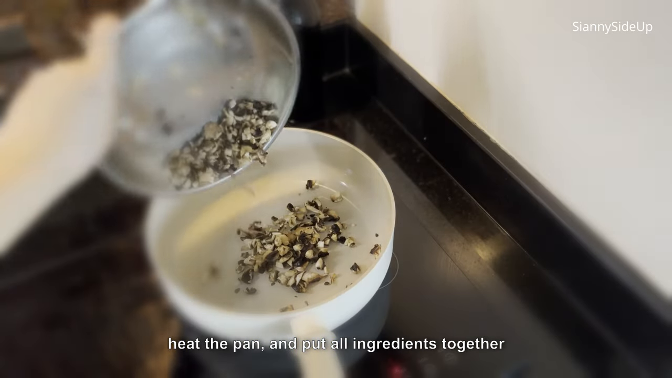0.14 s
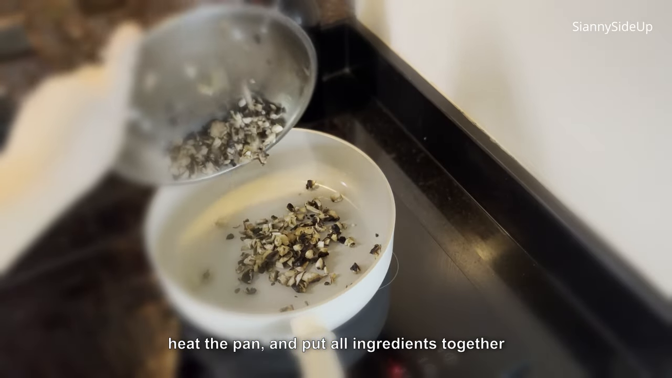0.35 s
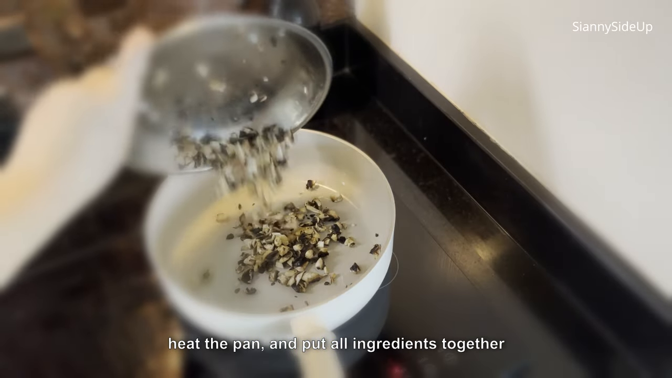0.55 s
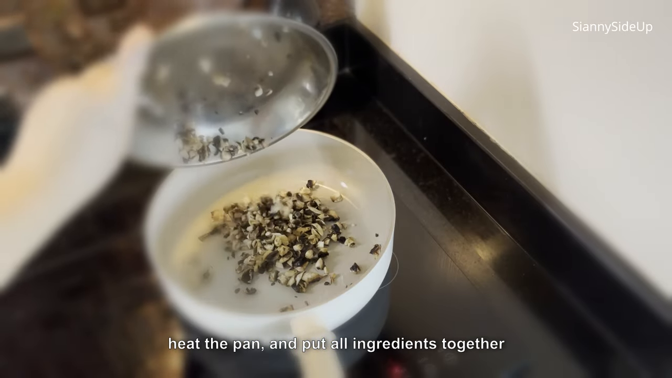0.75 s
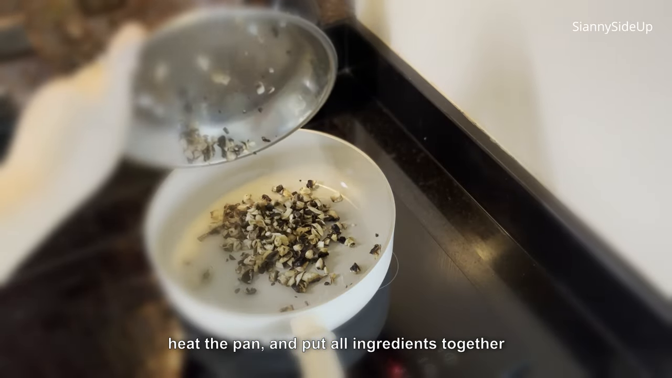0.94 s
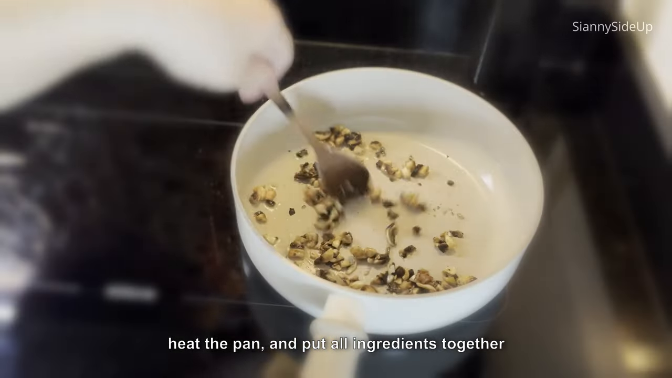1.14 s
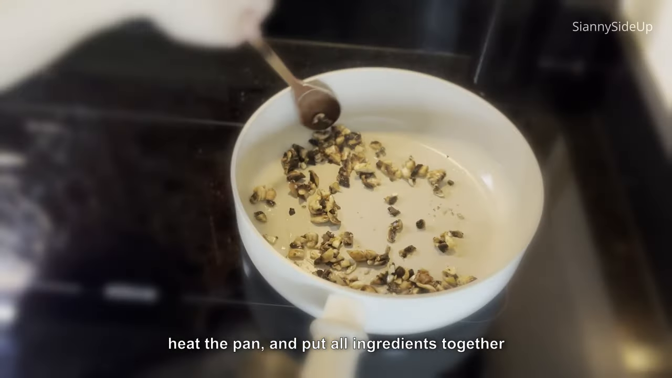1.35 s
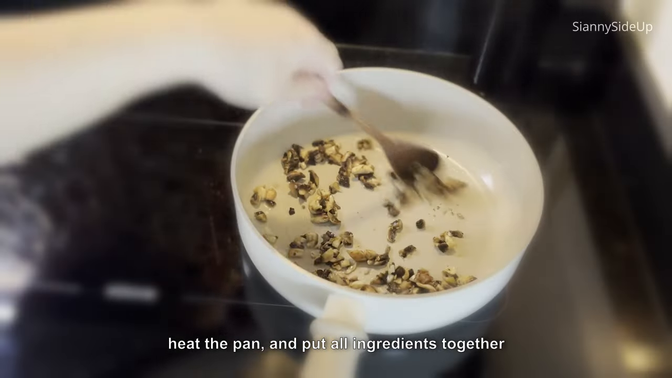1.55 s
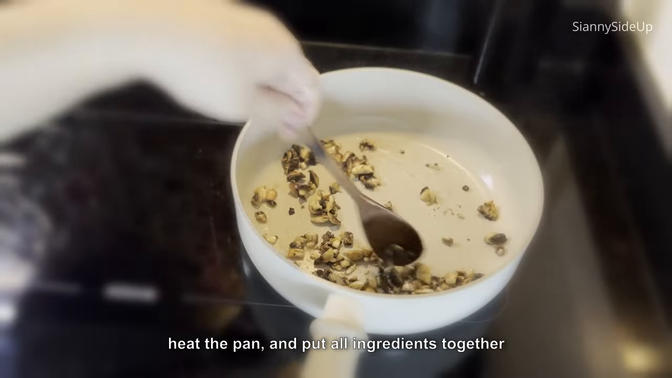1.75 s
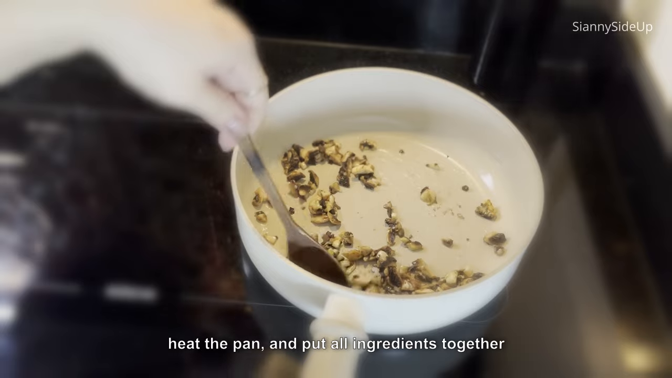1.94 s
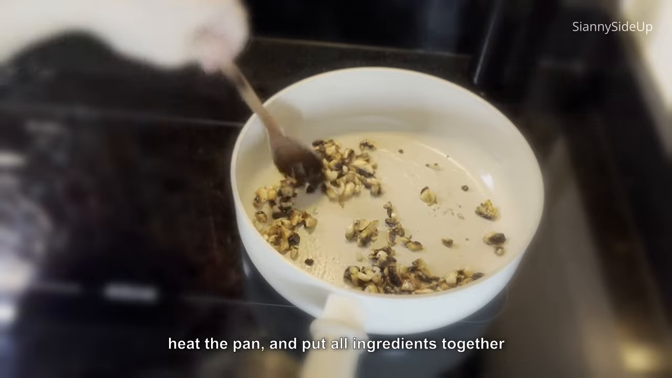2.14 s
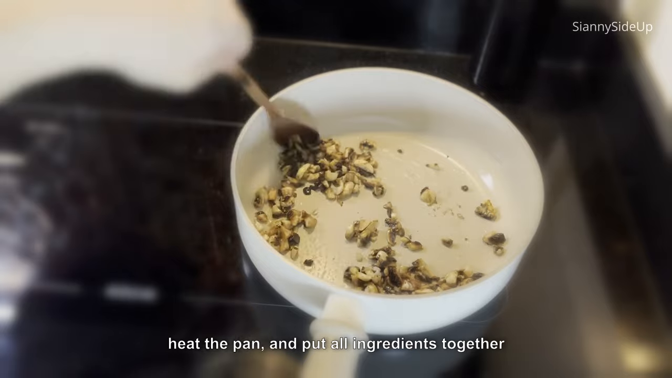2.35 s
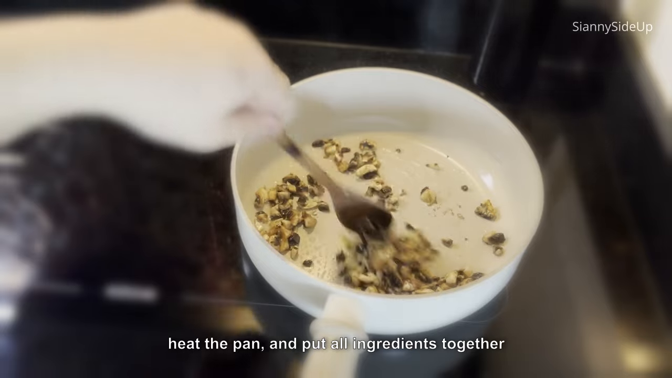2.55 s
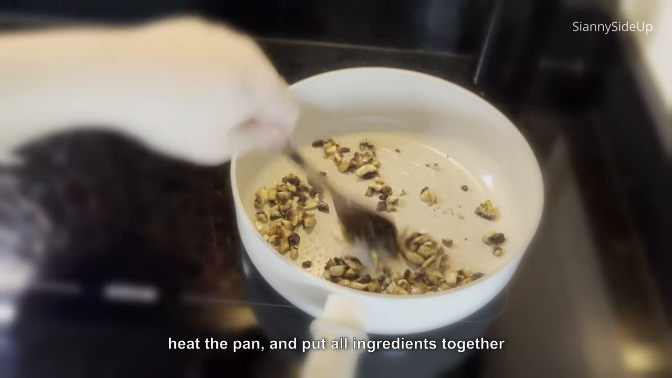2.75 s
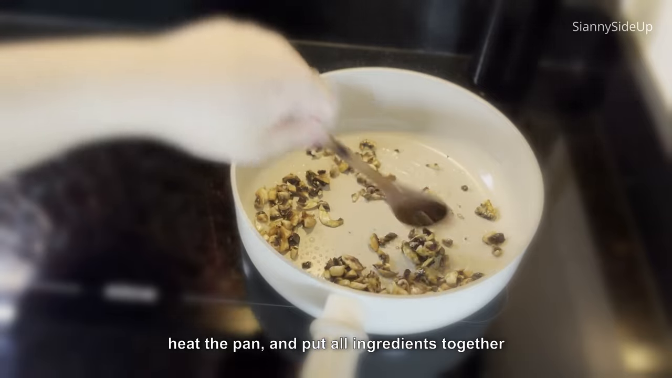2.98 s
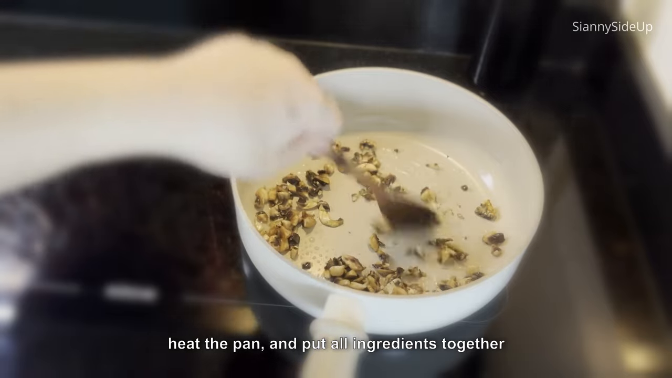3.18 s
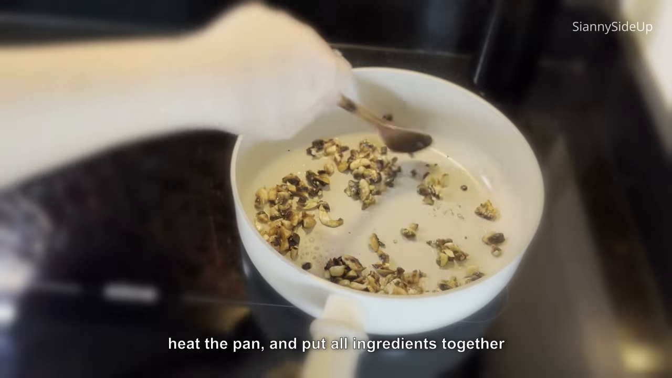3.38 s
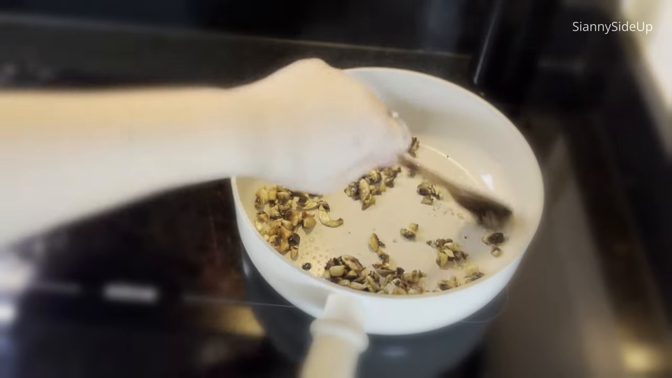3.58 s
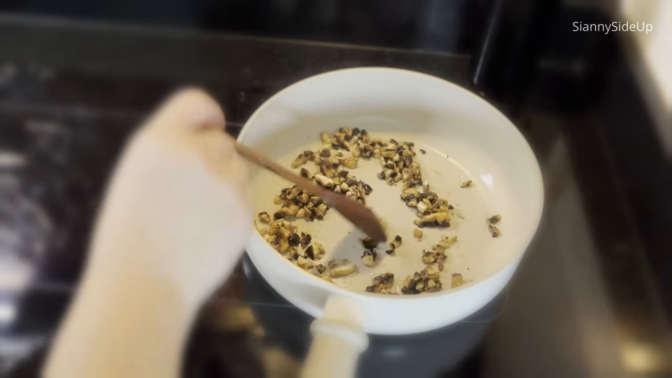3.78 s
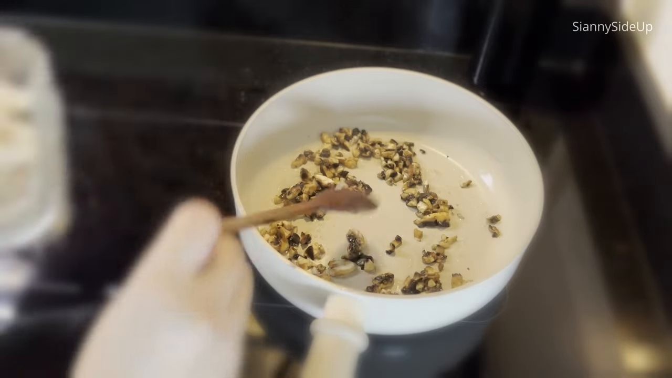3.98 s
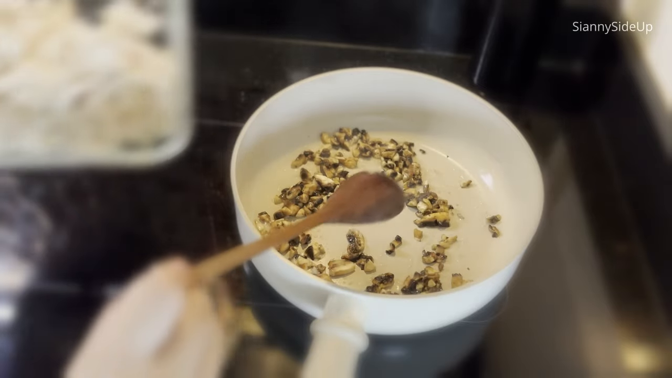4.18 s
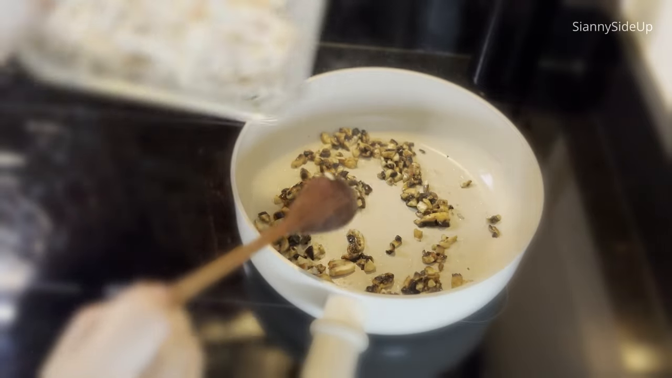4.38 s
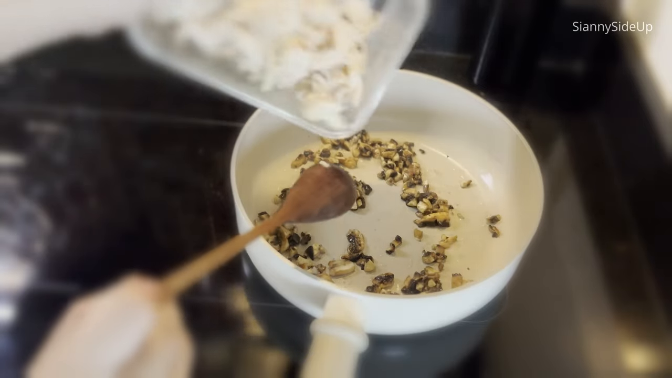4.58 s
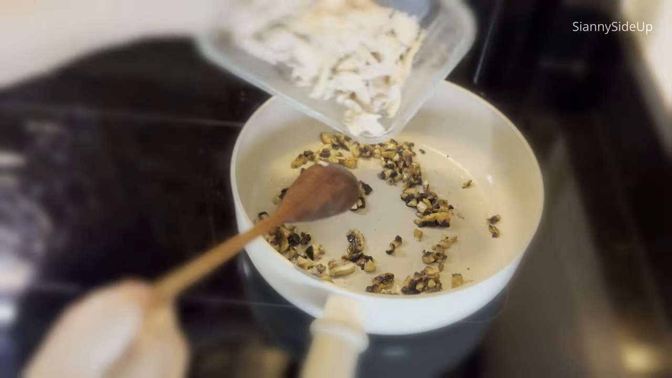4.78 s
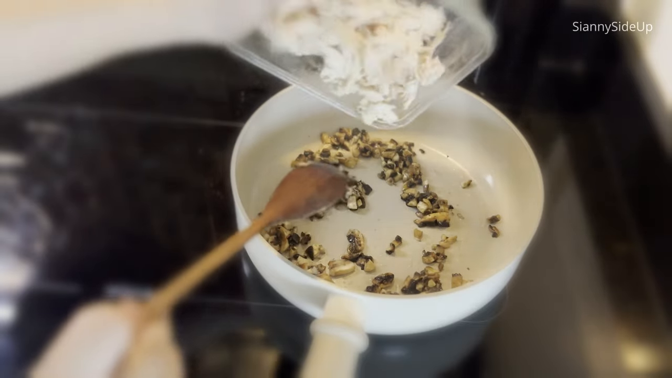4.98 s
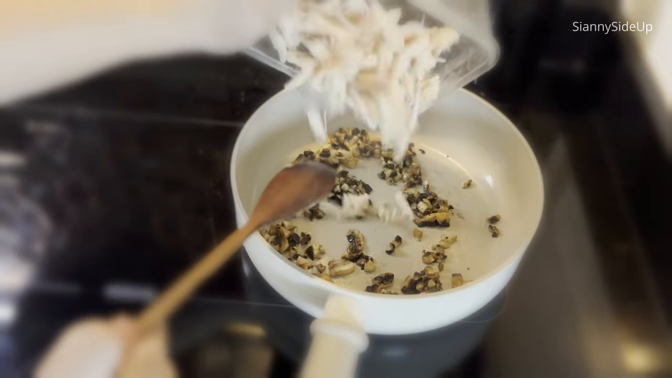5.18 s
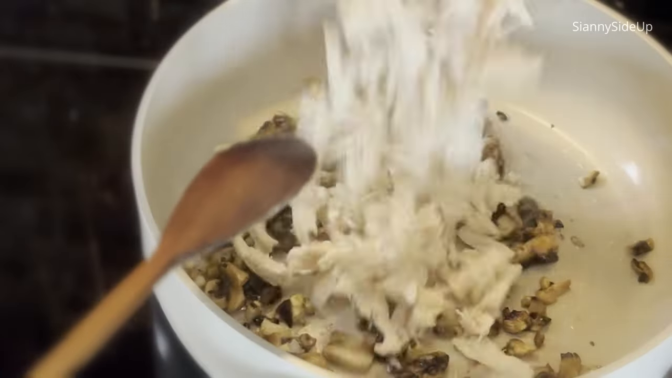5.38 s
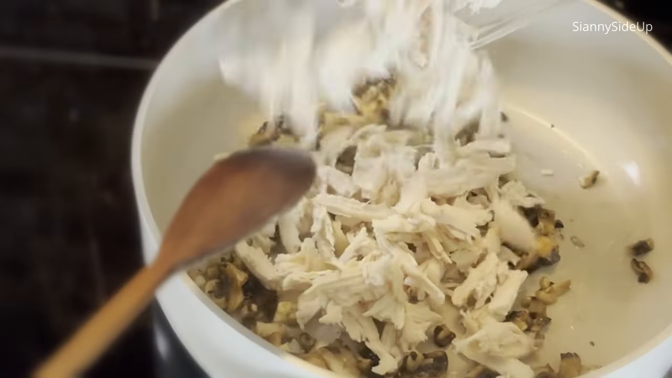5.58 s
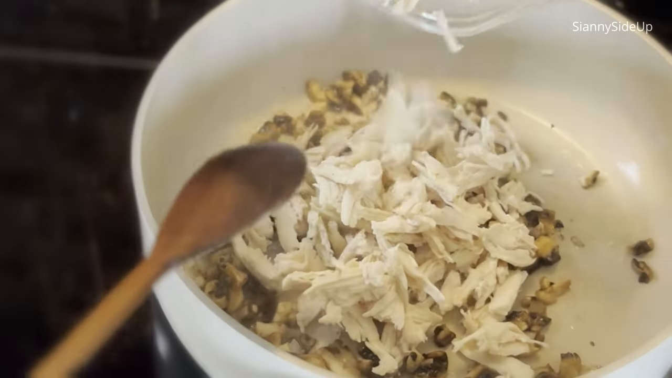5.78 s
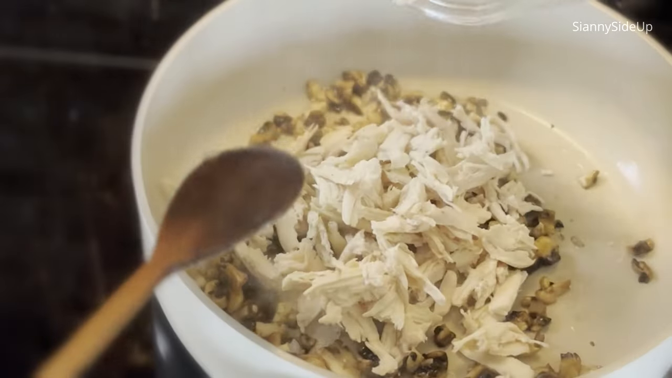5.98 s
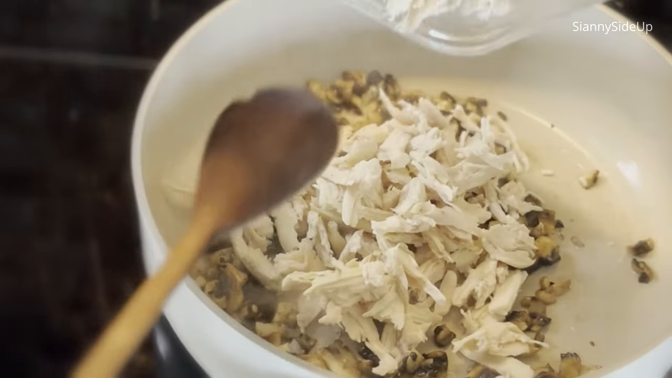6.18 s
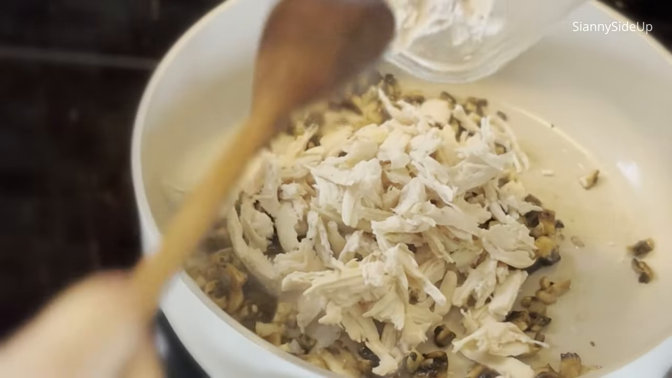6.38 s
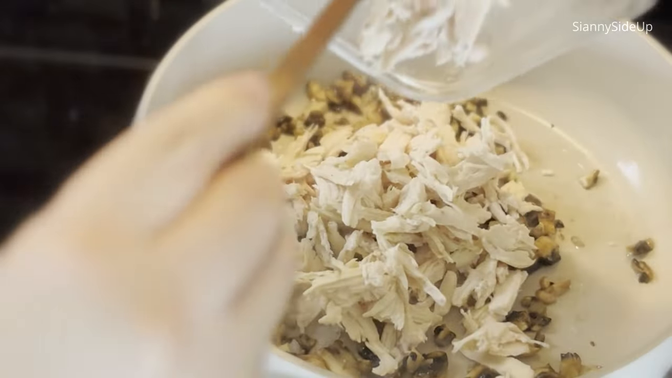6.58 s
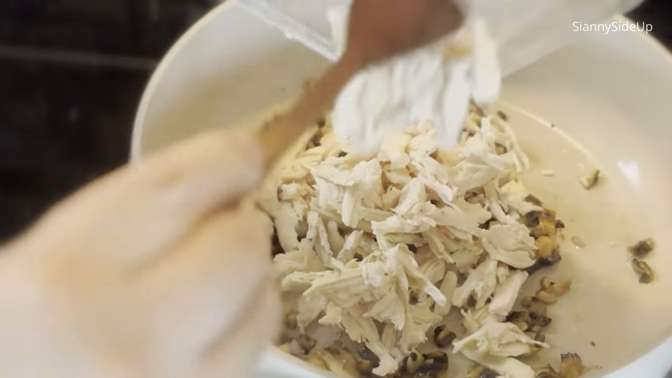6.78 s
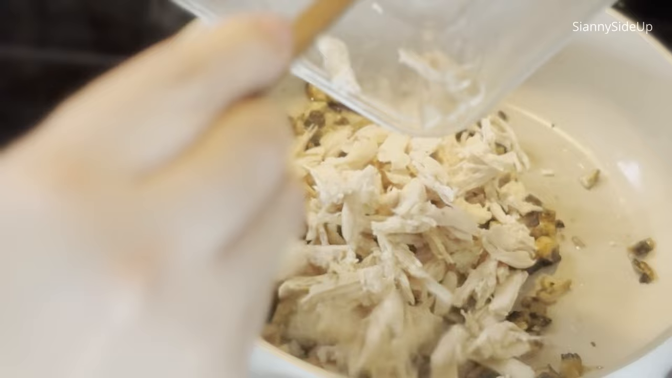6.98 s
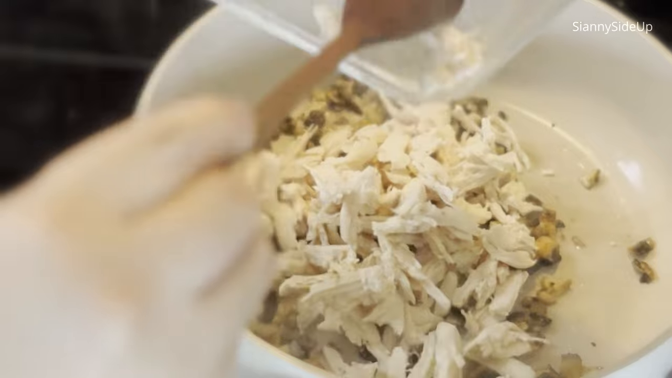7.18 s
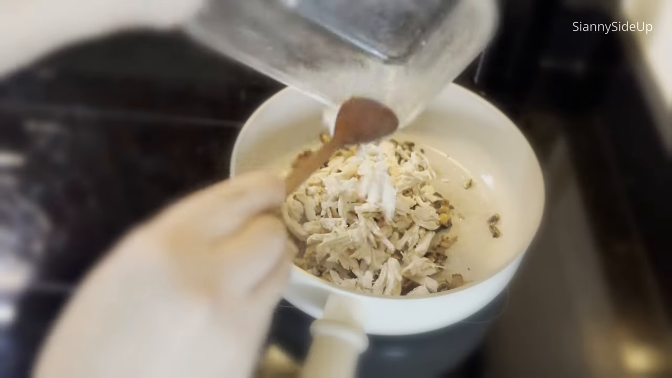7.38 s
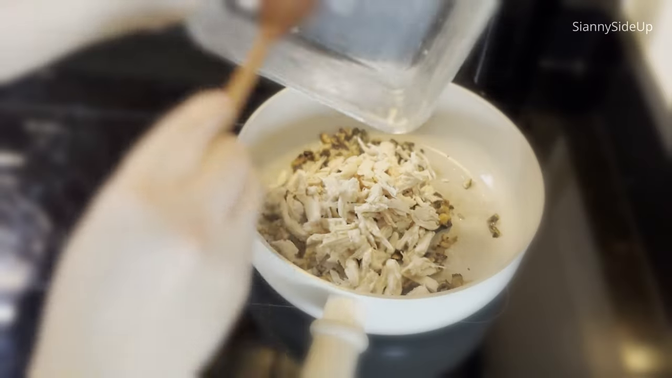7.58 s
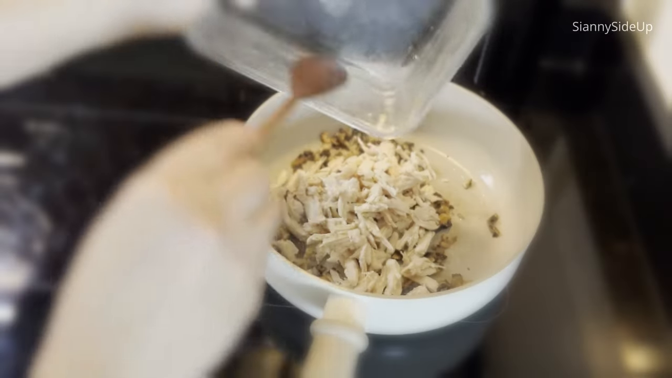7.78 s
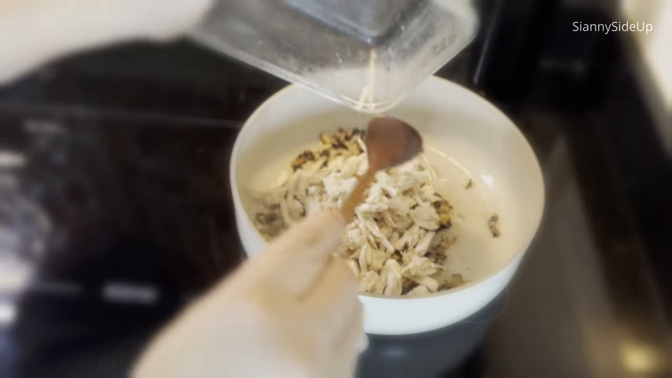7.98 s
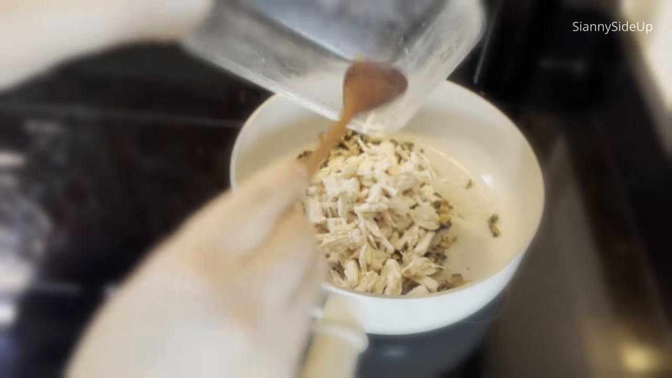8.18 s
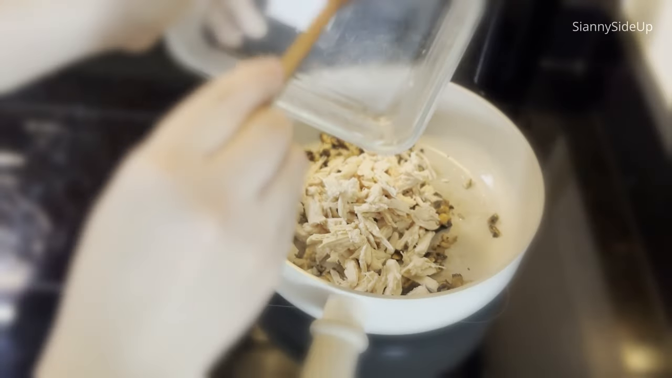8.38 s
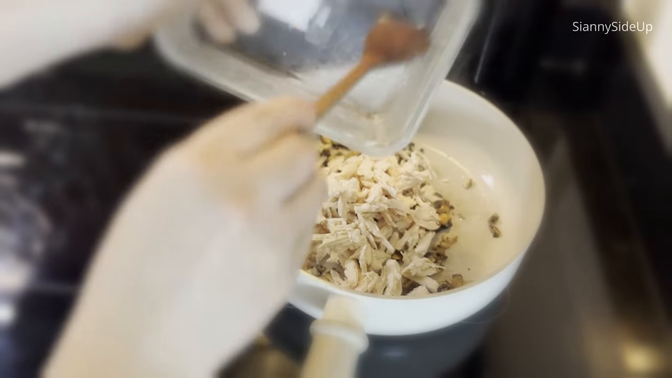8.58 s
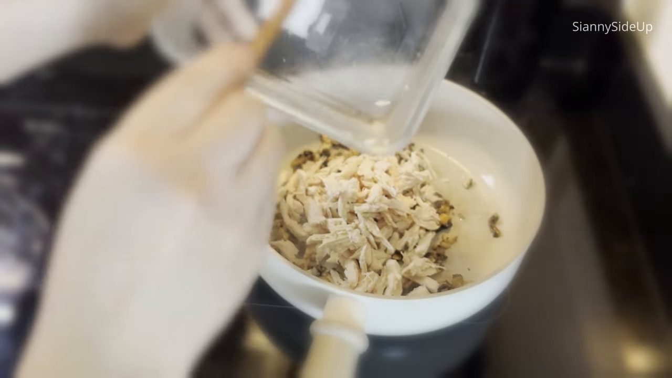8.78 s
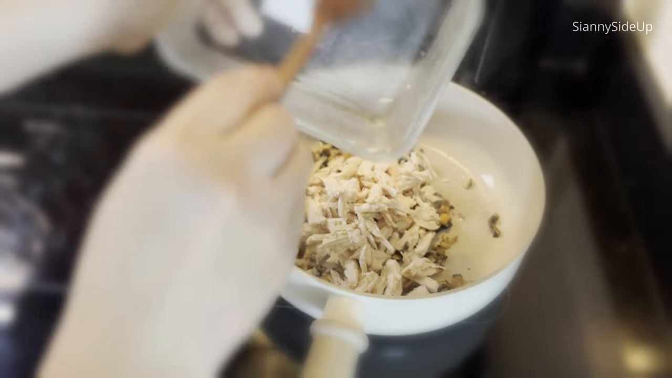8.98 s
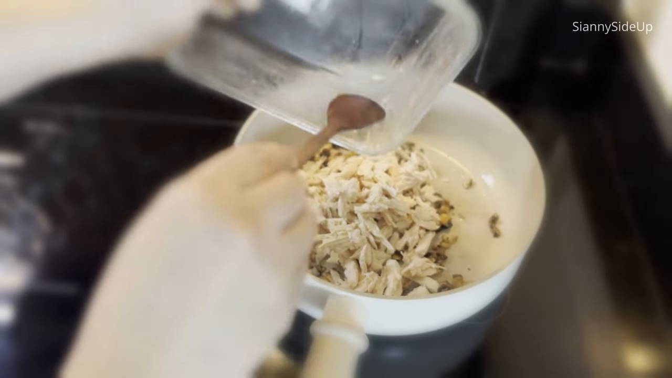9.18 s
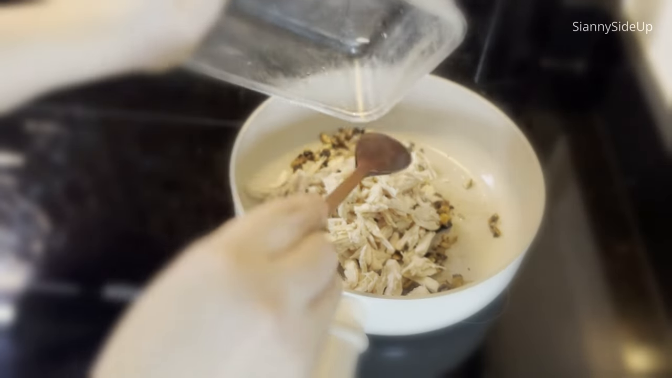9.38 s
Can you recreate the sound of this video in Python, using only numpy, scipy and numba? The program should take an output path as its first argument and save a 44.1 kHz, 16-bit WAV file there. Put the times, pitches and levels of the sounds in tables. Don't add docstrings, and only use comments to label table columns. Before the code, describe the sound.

Chopped food sizzles softly in a pan while a wooden spoon stirs and taps, then knocks sharply on a glass dish being emptied.

```python
import sys
import numpy as np
from scipy import signal
from scipy.fft import rfft, irfft
from scipy.io import wavfile
from numba import njit

SR = 44100
rng = np.random.default_rng(int(sys.argv[2]) if len(sys.argv) > 2 else 0)


def wav_record(signal):
    frames = np.transpose(np.atleast_2d(signal))
    bounded = np.clip(frames, -1, 1)
    quanta = np.round(bounded * 32767).astype(np.int16)
    wavfile.write(sys.argv[1], SR, quanta)


def how_loud(loudness_db):
    steps = np.asarray(loudness_db, float) / 20
    return 10 ** steps


N = 416241

# start in seconds, then hiss, crackle and pan body, all
# in dB.
STAGES = [
    (0.0, -62.5, -63, -73.5),
    (1.048, -65, -70.5, -67),
    (3.705, -59, -60.5, -63.5),
    (5.35, -57, -60, -61.5),
    (7.1, -56.5, -61.5, -61.5),
]


def rms_one(x):
    return x / np.sqrt(np.mean(x ** 2) + 1e-20)


def in_time(rows, silent_db=-120):
    s, first, *rest = np.transpose(rows)
    t = np.arange(N) / SR
    return [np.interp(t, s, first, silent_db, silent_db)] + [np.interp(t, s, c) for c in rest]


def held(rows, column):
    rows = np.array(rows)
    row_now = np.searchsorted(rows[:, 0], np.arange(N) / SR, "right") - 1
    return rows[np.maximum(row_now, 0), column]


def swells(rows, lean, column=2):
    t = np.arange(N) / SR
    power = np.zeros(N)
    for row in rows:
        done = np.clip((t - row[0]) / row[1], 0, 1)
        height = np.sin(np.pi * done ** lean) ** 0.72
        power += (how_loud(row[column]) * height) ** 2
    return 10 * np.log10(power + 1e-14)


def drift(rate):
    every, settle = 40, 2000
    r = np.exp(-2 * np.pi * every * rate / SR)
    noise = rng.standard_normal(N // every + settle + 2)
    slow = signal.lfilter([1], [1, -2 * r, r * r], noise)[settle:]
    return np.interp(np.arange(N) / every, np.arange(len(slow)), rms_one(slow))


def colour(x, points):
    hz, level_db = np.transpose(points)
    grid = np.maximum(np.fft.rfftfreq(len(x), 1 / SR), 1)
    gain = how_loud(np.interp(np.log(grid), np.log(hz), level_db, -90, -90))
    return rms_one(irfft(rfft(x) * gain, len(x)))


def pops(per_s, spread_db, smooth):
    sizes = how_loud(spread_db * np.minimum(rng.exponential(1, N), 5)) * rng.choice([-1, 1], N)
    bursts = rms_one(sizes * (rng.random(N) < per_s / SR))
    return rms_one(bursts + smooth * rng.standard_normal(N))


@njit
def sweep(x, hz, r, sr):
    y = np.zeros(len(x))
    for i in range(2, len(x)):
        y[i] = x[i] - x[i - 2] + 2 * r * np.cos(2 * np.pi * hz[i] / sr) * y[i - 1] - r * r * y[i - 2]
    return y


def whistle(level_db, hz, width_hz):
    r = np.exp(-np.pi * width_hz / SR)
    once = sweep(rng.standard_normal(len(hz)), hz, r, SR)
    return how_loud(level_db) * rms_one(sweep(once, hz, r, SR))


def ring(force, hz, t60):
    r, w = how_loud(-60 / (t60 * SR)), 2 * np.pi * hz / SR
    return signal.lfilter([0, np.sin(w)], [1, -2 * r * np.cos(w), r * r], force + 1e-18)


def struck(blows, modes_hz, modes, rattle_s, rattle, band_hz, trim_db, crack_db, crack_t60, reach_above=0.74):
    out, size = np.zeros(N), 4096
    crack_count, reach_below = 18, 1.3
    modes_hz = [*modes_hz, *np.geomspace(*band_hz, num=crack_count)]
    modes = [*modes, *[(crack_db, crack_t60)] * crack_count]
    shape = np.exp(-np.arange(size) / (rattle_s * SR))
    contacts = rng.standard_normal((len(blows), len(modes), size))
    touch = rattle * contacts * shape / np.sqrt(np.sum(shape ** 2))
    touch[:, :, 0] = 1
    for m, (hz, (level_db, t60)) in enumerate(zip(modes_hz, modes)):
        force = np.zeros(N + size)
        for k, (s, peak_db, pivot_hz, below, above) in enumerate(blows):
            octaves = np.clip(np.log2(hz / pivot_hz), -reach_below, reach_above)
            tilt_db = octaves * (above if octaves > 0 else below)
            force[round(s * SR):][:size] += how_loud(peak_db + tilt_db + level_db + trim_db) * touch[k, m]
        out += (-1) ** m * ring(force[:N], hz, t60)
    low_hz, high_hz = band_hz
    out = signal.sosfilt(signal.butter(3, low_hz, "high", fs=SR, output="sos"), out)
    return signal.sosfilt(signal.butter(10, high_hz, fs=SR, output="sos"), out)


def frying():
    # time in seconds, vigour in dB.
    pour_rows = [
        (0.0, -1.5),
        (0.2, 2),
        (0.25, 1.5),
        (0.514, 3),
        (0.56, 2),
        (0.622, 0),
        (0.712, 9),
        (0.94, 11.5),
        (1.048, 10.5),
    ]
    # time in seconds, vigour in dB.
    fry_rows = [(1.05, 5.5), (1.22, 6.5), (1.47, 4.5), (1.82, 8), (2.03, 5), (2.6, 7.5), (3.01, 5.5),
                (3.7, 5), (3.71, 1), (3.92, 1.3), (4.99, -0.5), (5.35, 1), (5.42, 1.5), (5.6, 0), (6.7, 0),
                (7.23, 0.8), (7.36, 0), (9.44, -0.1)]
    pour_follow = [1.08, 0.58, 0.5]
    fry_follow = [0.8, 1.4, 0.43]
    # frequency in Hz, density in dB per Hz.
    hiss_shape = [(1940, -87), (3300, -9), (3960, -26.5), (4260, -6), (4660, 4), (5210, -0.5), (5640, -6),
                  (6500, -10.5), (8450, -11.5), (14300, -120)]
    crackle_shape = [(3410, -43), (5800, -5.5), (6960, -5), (7400, -0.5), (8690, 0.5), (9360, -1.5),
                     (10100, -1.5), (10700, -9.5), (11000, -9), (11800, -4), (13200, -1), (13700, -2),
                     (15600, -9)]
    body_shape = [(260, -45), (450, -7.5), (476, -9), (518, -10.5), (636, -1), (1050, -6), (1200, -1),
                  (1470, -2.5), (2010, 1.5), (2580, 3), (2890, 7), (3420, -3.5), (4200, 4.5), (5460, -22),
                  (9240, -120)]
    # frequency in Hz, density in dB per Hz.
    early_body_shape = [(400, -46), (700, -13), (1300, -17.5), (2000, -12), (2500, -7), (2700, 2.5),
                        (2950, -8), (3100, -8), (3450, -10), (3900, -3), (4200, -4), (5000, -43)]
    early = np.arange(N) < STAGES[1][0] * SR
    (pour,), (vigour,) = in_time(pour_rows, silent_db=-1.5), in_time(fry_rows, silent_db=0)
    hiss_db, crackle_db, body_db = [
        held(STAGES, column=k + 1) + pour_follow[k] * pour + fry_follow[k] * vigour for k in range(3)]
    shared = drift(12.0)

    fizz = pops(6000, 6.3, 1.46)
    early_hiss_shape = np.multiply(hiss_shape, [1.024, 1])
    fizz = np.where(early, colour(fizz, early_hiss_shape), colour(fizz, hiss_shape))
    hiss = how_loud(hiss_db + 0.69 * shared + 0.61 * drift(25)) * fizz

    snaps = colour(pops(11000, 4.0, 2.8), crackle_shape)
    crackle = how_loud(crackle_db + 0.5 * shared + 1.05 * drift(32)) * snaps

    bursts = pops(2500, 1.6, 2.3)
    bursts = np.where(early, colour(bursts, early_body_shape), colour(bursts, body_shape))
    body = how_loud(body_db + 0.5 * shared + 1.52 * drift(6.5)) * bursts
    return hiss + crackle + body


def spits():
    # time in seconds, peak in dB, pitch in Hz.
    landing = [(0.6606, -48, 4770), (0.6771, -35, 4920), (0.704, -46, 4780), (0.721, -35, 5110),
               (0.7305, -37, 4600), (0.7399, -40, 4660), (0.7619, -44, 4650), (0.8088, -34, 5000),
               (0.8457, -37, 4680), (0.8599, -36, 4840), (0.8729, -37, 5000), (0.8901, -34, 4910),
               (0.9001, -36, 4830), (0.9079, -34, 5060), (0.9265, -37, 4620), (0.9405, -31, 4560),
               (0.9514, -32, 4530), (0.9693, -30, 4730), (0.9796, -35, 4940), (0.9949, -32, 5170),
               (1.0093, -31, 4640), (1.0419, -36, 5050)]
    # time in seconds, peak in dB, pitch in Hz.
    stirred = [(1.6771, -44, 4690), (1.707, -39, 4700), (1.7184, -41, 4560), (1.7816, -44, 4960),
               (2.167, -45, 4680), (2.1824, -47, 4650), (2.2119, -47, 4700), (2.2204, -45, 4850),
               (2.2284, -46, 4600), (2.2608, -48, 4640), (2.2874, -47, 4730), (2.3082, -39, 4810),
               (2.5326, -49, 4720), (2.5596, -47, 4670), (2.58, -41, 4740), (2.5904, -41, 4820),
               (2.609, -35, 4590), (2.6624, -49, 4660), (2.712, -48, 4760)]
    out, size, rows = np.zeros(N), 600, landing + stirred
    puff_s, snap = 0.0026, 3.4
    puffs = rng.standard_normal((len(rows), size)) * np.exp(-np.arange(size) / (puff_s * SR))
    puffs[:, 0] = snap
    for (s, peak_db, hz), puff in zip(rows, puffs):
        burst = ring(puff, hz, t60=0.007)
        bright = how_loud(-16) * np.diff(puff, prepend=0) / 2
        burst = burst / np.abs(burst).max() + bright
        part = out[round(s * SR):][:size]
        part += how_loud(peak_db - 3.5) * burst
    return signal.sosfilt(signal.butter(4, 4200, "high", fs=SR, output="sos"), out)


def steel_bowl():
    # frequency in Hz, width in Hz, level in dB.
    bowl_modes = [(1377, 43, 5), (1810, 120, 1), (2300, 49, -8), (3040, 31, 5)]
    # start in seconds, length in seconds, level in dB.
    slides = [
        (0.22, 0.079, -94),
        (0.5, .13, -85),
        (0.67, 0.19, -83.5),
        (0.93, 0.22, -84),
    ]
    # multiple of twice the mains frequency, level in dB.
    buzz_lines = [(6, -22), (7, -11), (11, -9), (14, -11), (18, -9), (22, -7), (27, 9.5), (29, 5),
                  (30, -16), (31, -7), (35, 10)]
    # time in seconds, level in dB.
    loading = [
        (0.0, -94),
        (0.27, -92),
        (0.34, -84),
        (0.578, -72),
        (0.7, -79),
        (0.85, -73),
        (.9, -75),
        (1.04, -81),
    ]
    buzz_hz = 99.92
    t, (top_db,) = np.arange(N) / SR, in_time(loading)
    lower_db = np.where(t < STAGES[1][0], -83.5, -120)
    out = np.zeros(N)
    for k, db in buzz_lines:
        loaded_db = top_db if k > 33 else lower_db
        height = how_loud(loaded_db + db + 1 + 1.8 * drift(8))
        out += height * np.sin(2 * np.pi * k * buzz_hz * t + 0.6 * drift(3.3) + 0.45 * drift(30))
    ringing_db = swells(slides, lean=0.7)
    for hz, width_hz, db in bowl_modes:
        out += whistle(ringing_db + db + 2.2 * drift(5.9), np.full(N, float(hz)), width_hz)
    return out


def stirring():
    # start in seconds, length in seconds, level in dB, pitch in Hz.
    strokes = [
        (1.665, 0.12, -47.5, 4620),
        (2.13, 0.16, -53.5, 4770),
        (2.5, 0.24, -54.5, 4670),
        (2.8, 0.096, -56.5, 4700),
        (2.58, 0.053, -47, 4700),
        (3.2, 0.19, -57, 4520),
    ]
    # start in seconds, length in seconds, level in dB, pitch in Hz.
    drags = [
        (1.485, 0.23, -64, 692),
        (1.71, 0.073, -66.5, 756),
        (1.88, 0.19, -78, 800),
        (2.325, 0.13, -62.5, 760),
        (3.14, 0.3, -65.5, 700),
        (3.52, 0.28, -74, 760),
        (3.67, 0.068, -54.5, 720),
        (3.74, 0.2, -71, 740),
    ]
    lean = 0.93
    pushed = whistle(swells(strokes, lean) - 3 + 1.9 * drift(34), held(strokes, column=3), width_hz=620)
    dragged = whistle(swells(drags, lean) - 3 + 4.1 * drift(26), held(drags, column=3), width_hz=134)
    return pushed + dragged


def hollow():
    # time in seconds, then lowest, middle and top resonance in Hz.
    gap_bands = [(4.5, 742, 2790, 4470), (5.0, 870, 2770, 4470), (5.42, 925, 2780, 4240),
                 (5.56, 950, 2820, 4250), (5.63, 955, 3000, 4370), (5.7, 910, 3030, 4400),
                 (5.78, 947, 2950, 4550), (5.87, 920, 2840, 4120), (5.97, 940, 2830, 4470),
                 (6.09, 930, 3000, 4000), (6.2, 870, 2940, 3880), (6.3, 864, 3030, 4240),
                 (6.42, 810, 3100, 4200), (6.54, 810, 3100, 4570), (6.66, 808, 2830, 4630),
                 (8.0, 793, 2820, 4700)]
    # start in seconds, length in seconds, level in dB.
    dish_moves = [
        (4.6, 0.39, -81),
        (4.85, 0.54, -69.5),
        (5.3, 0.34, -64.5),
        (5.6, 0.59, -66.5),
        (6.08, 0.43, -65),
        (6.55, 0.49, -68),
        (7.09, 0.32, -63.5),
        (7.36, 0.35, -67.5),
        (7.7, 0.16, -62),
    ]
    # start and length in seconds, middle and top level in dB.
    clumps = [(5.35, 0.19, -60, -51.5), (5.43, 0.11, -56, -60), (5.5, 0.21, -57.5, -52),
              (5.68, 0.12, -59, -49), (5.72, 0.15, -52, -54), (5.84, 0.24, -53.5, -49),
              (6.04, 0.15, -54, -52), (6.13, 0.16, -60, -53), (6.22, 0.19, -58.5, -51.5),
              (6.33, 0.2, -58.5, -50.5), (6.46, 0.19, -78, -50.5), (6.6, 0.12, -56.5, -62),
              (6.63, 0.22, -74, -51.5), (6.8, .09, -66, -52.5)]
    low_hz, mid_hz, top_hz = in_time(gap_bands, silent_db=800)
    low_db = swells(dish_moves, lean=0.65) - 1.5 + 1.9 * drift(35)
    mid_db = swells(clumps, lean=0.8) - 1.5 + 0.91 * drift(22)
    top_db = swells(clumps, lean=0.8, column=3) - 2.5 + 0.87 * drift(12)
    return (whistle(low_db, low_hz, width_hz=91) + whistle(mid_db, mid_hz, width_hz=290)
            + whistle(top_db, top_hz, width_hz=720))


def rubs():
    # start and length in
    # seconds, level in dB, pitch and width in Hz.
    squeezes = [(0.17, .03, -62, 8900, 5000), (1.197, .24, -62, 13550, 1410),
                (1.646, .22, -62, 13350, 1500), (1.68, 0.18, -60, 9600, 1400),
                (2.479, 0.21, -58, 8170, 1000), (2.53, 0.25, -60.5, 12200, 1300),
                (5.298, 0.21, -62.5, 2340, 250), (5.358, 0.32, -60, 5670, 1500),
                (5.38, 0.36, -65, 3550, 850), (5.577, 0.1, -57.5, 3450, 600), (5.42, 0.18, -61, 5250, 500),
                (5.622, .18, -59.5, 5970, 495), (2.8, 0.13, -65, 10900, 5000),
                (3.202, 0.22, -66.5, 11000, 5000)]
    # start and length in seconds, level in
    # dB, first and last pitch in Hz.
    glides = [(0.21, 0.055, -77, 1390, 1390), (0.66, 0.11, -63, 2700, 2940), (0.8, .12, -74, 2100, 2050),
              (0.924, 0.08, -67, 2190, 2100), (1.623, 0.21, -66.5, 1390, 1440),
              (2.016, 0.15, -79, 345, 343), (1.965, 0.16, -67, 3160, 3300), (2.403, .03, -58, 3350, 3280),
              (2.42, 0.078, -62, 3700, 3250), (2.4, .09, -67, 1530, 1510), (2.345, .045, -64, 1340, 1200),
              (8.57, 0.089, -45, 2121, 2240), (8.4, .2, -64, 810, 790), (7.2, 0.17, -65, 1600, 1600),
              (.22, .08, -76, 2300, 2200), (.48, 0.16, -79, 1800, 1800), (2.406, 0.075, -73, 330, 320),
              (2.595, .14, -64.5, 3300, 3700), (2.796, 0.14, -60.5, 3070, 2870),
              (3.6, 0.21, -73, 1600, 1660), (4.145, 0.13, -65, 2090, 1940), (4.196, 0.24, -72, 1180, 1140),
              (6.187, 0.17, -69, 1250, 1180), (7.146, 0.27, -65, 1800, 2040),
              (7.47, 0.27, -69.5, 1360, 1350), (7.518, 0.16, -69, 2040, 2300), (8.09, .22, -65, 2240, 2230),
              (8.1, 0.14, -72, 1070, 870), (8.801, .06, -64, 1610, 1610), (8.901, 0.16, -63.5, 1520, 1620)]
    out = np.zeros(N)
    rows = [(s, length, db, hz, hz, width) for s, length, db, hz, width in squeezes]
    rows += [(*glide, 60 + 0.025 * glide[3]) for glide in glides]
    for s, length_s, level_db, first_hz, last_hz, width_hz in rows:
        done = np.clip(np.arange(SR * 3 // 4) / SR / length_s, 0, 1)
        swell = np.sin(np.pi * done ** 0.88)
        rub = swell * whistle(level_db, first_hz + (last_hz - first_hz) * done, width_hz)
        part = out[round(s * SR):][:len(done)]
        part += rub[:len(part)]
    return out


def pan_taps():
    # time in seconds, level at the pivot in dB, pivot in Hz, slopes below and above in dB per octave.
    blows = [(1.51, -83, 990, -12, 2.5), (1.552, -76.5, 980, -12.5, 22), (1.949, -57, 2350, 10, 16),
             (2.322, -66, 1380, -7.5, 2), (2.336, -45, 1460, 30, -30), (2.35, -52, 1430, 26, -36),
             (2.408, -64, 1470, 7, -38), (3.156, -46, 990, -0.5, -46), (3.379, -78, 1410, 0, 0),
             (3.695, -88, 1190, -8, -2), (3.708, -80, 980, -5, -2)]
    pan_hz = [190, 350, 640, 735, 990, 1215, 1390, 1510, 1565, 2215, 2900, 3270, 3600]
    # level in dB, decay time T60 in seconds.
    pan_modes = [(-29, 0.16), (-11.5, 0.17), (-19, .12), (-6, 0.24), (-3, 0.052), (-7, 0.12), (-33, 0.081),
                 (-1, 0.11), (-14, 0.066), (1, 0.12), (-3, 0.1), (8.5, 0.037), (-8, 0.043)]
    return struck(blows, pan_hz, pan_modes, rattle_s=0.037, rattle=0.74, band_hz=[150, 4500], trim_db=-3.0,
                  crack_db=-9.5, crack_t60=0.025)


def dish_taps():
    # time in seconds, level at the pivot in dB, pivot in Hz, slopes below and above in dB per octave.
    dull_blows = [
        (7.024, -43, 920, 0.033, -16),
        (7.04, -46, 920, 0.033, -15),
        (7.15, -48.5, 890, 0.24, -5),
        (7.237, -36, 910, 0.3, -16.5),
        (7.708, -38, 925, 0.033, -16),
        (7.722, -44, 930, .1, -14),
        (8.462, -47, 795, 10, -20),
    ]
    # time in seconds, level at the pivot in dB, pivot in Hz, slopes below and above in dB per octave.
    bright_blows = [
        (8.56, -31.5, 970, 10, -13),
        (8.571, -33.5, 2170, 9.3, -13),
        (8.641, -37, 3000, 19, -16),
        (8.645, -17.5, 2220, 15, -17.5),
        (8.654, -21.5, 1860, 32, -42),
        (8.668, -46, 2050, 24, -40),
    ]
    dish_hz = [430, 780, 890, 1010, 1130, 1400, 1640, 1821, 2089, 2124, 2201, 2312, 2463, 2680, 2870, 3320,
               3480, 4080, 5960]
    # level in dB, decay time T60 in seconds.
    dish_modes = [(-25, 0.03), (-5, 0.055), (-5, 0.045), (-7.5, 0.05), (-4.5, 0.038), (-18, 0.24),
                  (-11, 0.086), (-6.5, 0.098), (-3, 0.11), (-10.5, 0.16), (-10, 0.15), (-16, 0.059),
                  (-9, 0.052), (-11, 0.04), (-17, 0.071), (2.8, 0.055), (-10, .04), (-7.5, 0.044),
                  (-18, 0.065)]
    dull = struck(dull_blows, dish_hz, dish_modes, rattle_s=0.023, rattle=0.9, band_hz=[300, 2600], trim_db=-3.0,
                  crack_db=-17, crack_t60=0.01, reach_above=2.4)
    bright = struck(bright_blows, dish_hz, dish_modes, rattle_s=0.03, rattle=0.59, band_hz=[500, 6100],
                    trim_db=-2.0, crack_db=-17, crack_t60=0.011)
    return dull + bright


def rim_knock():
    # time in seconds, level at the pivot in dB, pivot in Hz, slopes below and above in dB per octave.
    blows = [
        (7.801, -44.5, 3030, 4.8, -11),
        (7.808, -24.5, 2240, 22, -3),
        (7.811, -34, 2220, 11, 8),
        (7.816, -13.5, 2600, 25, -5),
    ]
    rim_hz = [1080, 1410, 1820, 2117, 2222, 2465, 2838, 2925, 3049, 3233, 3686, 4145, 4380, 4960, 5170,
              5311, 5598, 5830]
    # level in dB, decay time T60 in seconds.
    rim_modes = [(7, 0.071), (-3, 0.06), (-14, 0.068), (0, 0.11), (-10, 0.09), (-17, 0.048), (-5, 0.044),
                 (0.5, 0.047), (-19, .08), (-6.5, 0.033), (-3.5, 0.022), (-9, 0.033), (-1, 0.021),
                 (-15, 0.092), (-14, .05), (2.5, 0.095), (-10, 0.065), (-15, 0.049)]
    return struck(blows, rim_hz, rim_modes, rattle_s=0.014, rattle=0.45, band_hz=[900, 5950], trim_db=-7.5,
                  crack_db=-6.5, crack_t60=0.012)


def ticks():
    # time in seconds, peak in dB, low and high band edges in Hz.
    clicks = [
        (1.9492, -45, 610, 4530),
        (7.2376, -47, 800, 2600),
        (7.8095, -47, 5500, 9500),
        (7.8168, -28, 1800, 5750),
        (8.5605, -46, 2200, 6000),
        (8.6445, -44, 3500, 7000),
    ]
    out, size = np.zeros(N), 2000
    tail, tail_s = 0.1, 0.008
    splash = tail * rng.standard_normal((len(clicks), size)) * np.exp(-np.arange(size) / (tail_s * SR))
    splash[:, 0] = 1
    for (s, peak_db, low_hz, high_hz), x in zip(clicks, splash):
        x = signal.sosfilt(signal.butter(3, [low_hz, high_hz], "band", fs=SR, output="sos"), x)
        out[round(s * SR):][:size] += how_loud(peak_db) * x / np.abs(x).max()
    return out


def clatter():
    # time in seconds, rms level in dB, low and high band edges in Hz, decay time T60 in seconds.
    rattles = [
        (3.156, -63, 280, 420, 0.24),
        (7.817, -39, 2300, 3360, 0.22),
        (7.816, -45, 4900, 5800, 0.17),
        (8.462, -57, 690, 895, 0.067),
        (8.572, -50, 1500, 2720, 0.23),
        (8.646, -37, 1580, 2600, 0.2),
        (8.646, -50, 3700, 6000, 0.23),
    ]
    out, t = np.zeros(N), np.arange(SR // 3) / SR
    noises = rng.standard_normal((len(rattles), len(t)))
    for (s, level_db, low_hz, high_hz, t60), x in zip(rattles, noises):
        x = signal.sosfilt(signal.butter(3, [low_hz, high_hz], "band", fs=SR, output="sos"), x)
        onset = np.minimum(t / 0.0021, 1)
        out[round(s * SR):][:len(t)] += how_loud(level_db - 60 * t / t60) * onset * rms_one(x)
    return out


def thuds():
    # time in seconds, peak in dB, pitch in Hz.
    bumps = [
        (2.07, -78, 119),
        (2.447, -68, 320),
        (3.009, -79, 141),
        (3.92, -63, 142),
        (4.198, -69, 155),
        (5.201, -70, 313),
        (5.418, -71, 155),
        (6.799, -80, 128),
        (9.299, -79, 135),
    ]
    out, size = np.zeros(N), 1400
    pushes = rng.standard_normal((len(bumps), size)) * np.hanning(size)
    for (s, peak_db, hz), push in zip(bumps, pushes):
        force = np.zeros(N)
        force[round(s * SR):][:size] = how_loud(peak_db - 26.0) * push
        out += ring(force, hz, t60=0.074)
    return signal.sosfilt(signal.butter(2, [90, 450], "band", fs=SR, output="sos"), out)


def kitchen(x):
    t = np.arange(int(0.5 * SR)) / SR
    t60_s, build_s = 0.26, 0.0024
    tail = rng.standard_normal(len(t)) * how_loud(-60 * t / t60_s) * np.clip(t / build_s, 0, 1)
    return signal.fftconvolve(x, tail / np.sqrt(np.sum(tail ** 2)))[:N]


def fan():
    # frequency in Hz, rms level in dB.
    hum_lines = [(49, -99), (66.5, -80.5), (100, -87.5), (140, -92), (152, -96.5), (199, -93.5)]
    # frequency in Hz, density in dB per Hz.
    air_shape = [(15, -10), (35, -6), (65, -8.5), (120, -4.5), (250, -3), (400, -7.5), (600, -6.5),
                 (800, -42)]
    t = np.arange(N) / SR
    out = how_loud(-83.5) * colour(rng.standard_normal(N), air_shape)
    for hz, db in hum_lines:
        phase = 2 * np.pi * hz * t + 1.27 * drift(1.8) + 0.34 * drift(8)
        out += how_loud(db + 3.0 + 0.25 * drift(4.3)) * np.sin(phase)
    return out


def scene():
    knocks = pan_taps() + dish_taps() + rim_knock()
    steady = frying() + stirring() + rubs() + steel_bowl() + hollow() + fan()
    mono = steady + thuds() + knocks + how_loud(-6.5) * kitchen(knocks) + ticks() + clatter() + spits()
    return np.vstack([mono, mono])


def band_gaps(x):
    # start and end in seconds, low and high band edges in Hz.
    gaps = [
        (7.818, 7.85, 6200, 7500),
        (7.819, 7.832, 8000, 9500),
    ]
    fade_s = 0.004
    for start, end, low_hz, high_hz in gaps:
        band = signal.sosfiltfilt(signal.butter(4, [low_hz, high_hz], "band", fs=SR, output="sos"), x)
        corners = [start - fade_s, start, end, end + fade_s]
        x = x - band * np.interp(np.arange(N) / SR, corners, [0, 1, 1, 0])
    return x


def low_pass(x):
    return signal.sosfilt(signal.butter(12, 15750, fs=SR, output="sos"), x)


def record(dry):
    mix = band_gaps(dry)
    return low_pass(mix)


dry = scene()
out = record(dry)
wav_record(out)
```